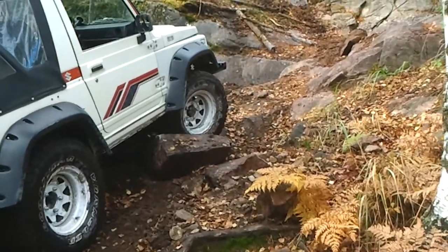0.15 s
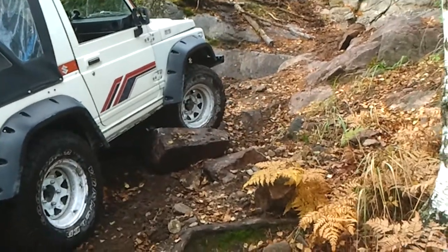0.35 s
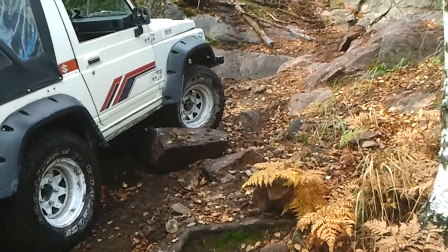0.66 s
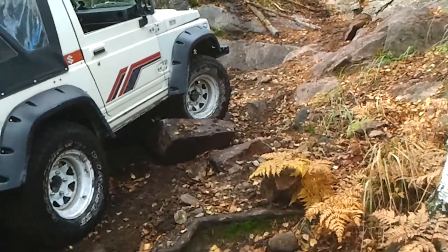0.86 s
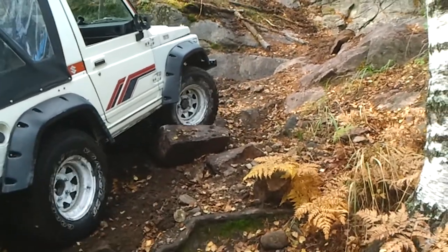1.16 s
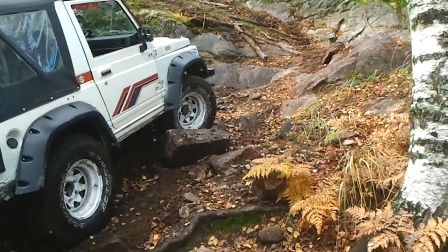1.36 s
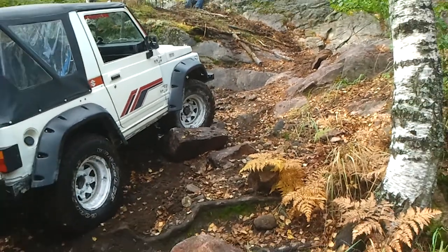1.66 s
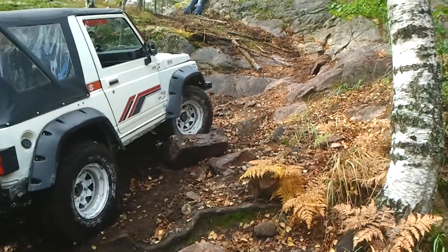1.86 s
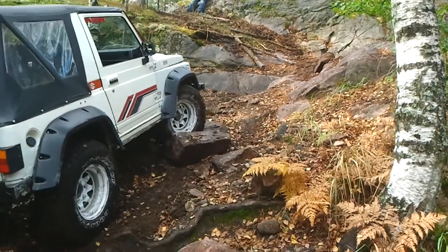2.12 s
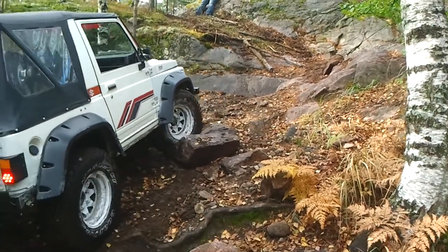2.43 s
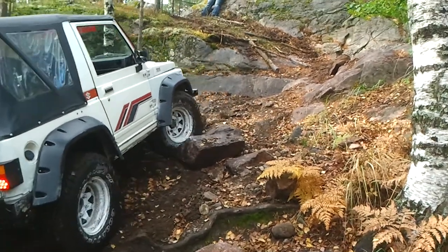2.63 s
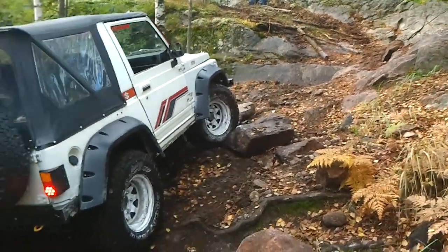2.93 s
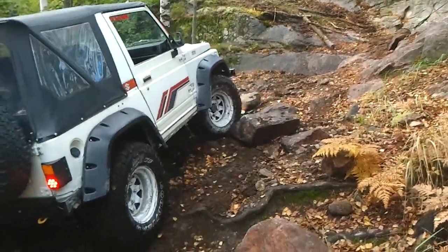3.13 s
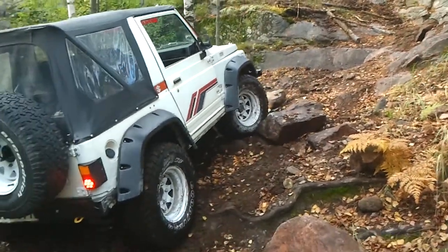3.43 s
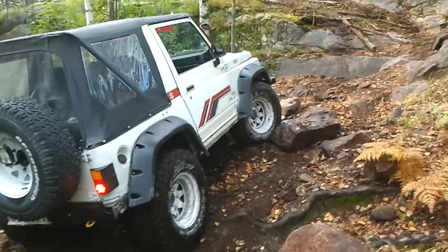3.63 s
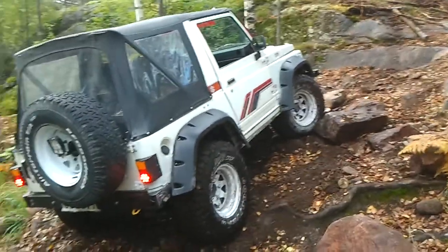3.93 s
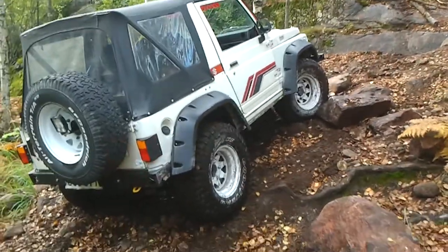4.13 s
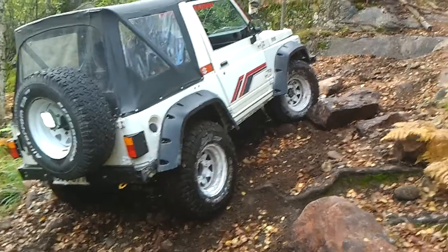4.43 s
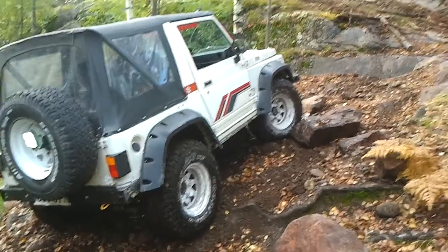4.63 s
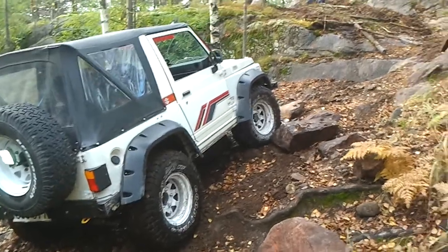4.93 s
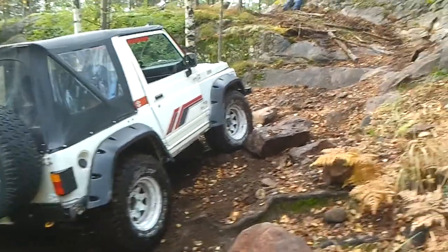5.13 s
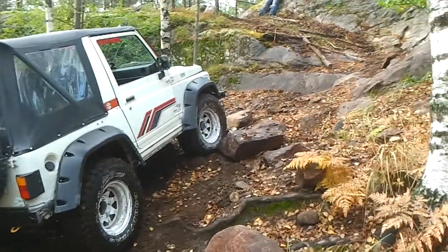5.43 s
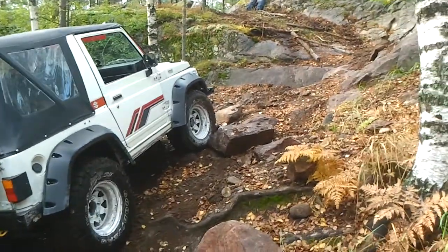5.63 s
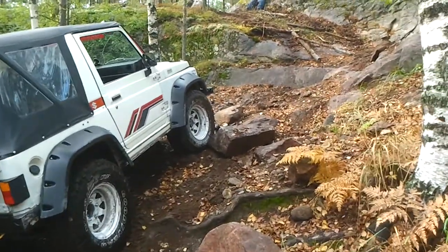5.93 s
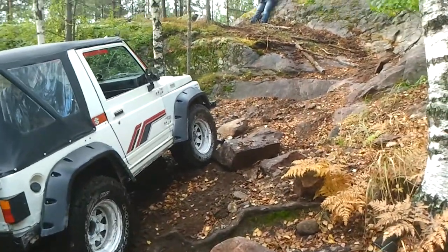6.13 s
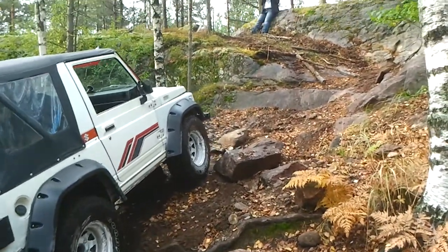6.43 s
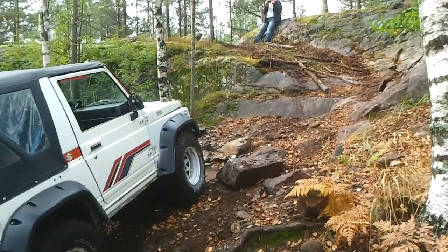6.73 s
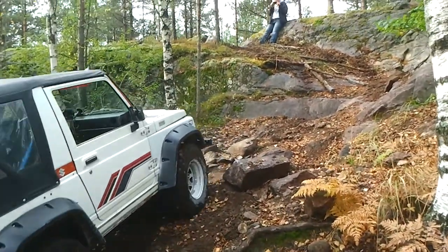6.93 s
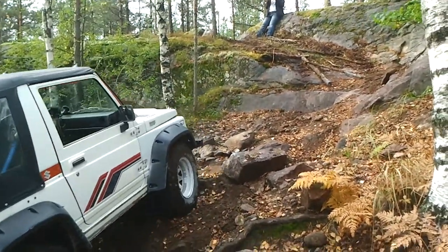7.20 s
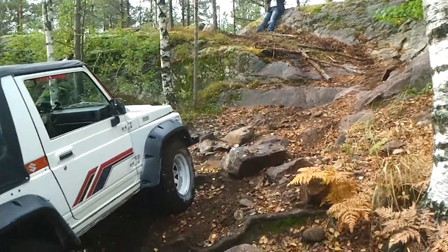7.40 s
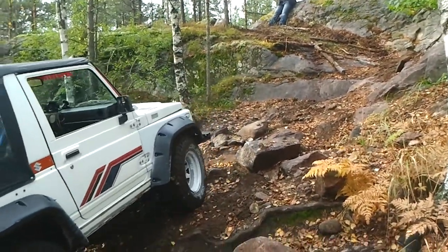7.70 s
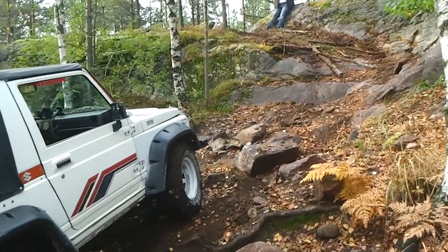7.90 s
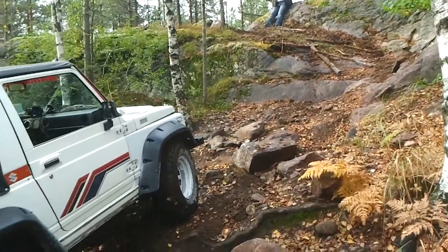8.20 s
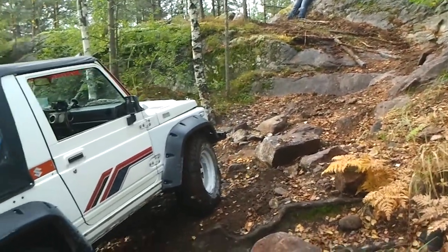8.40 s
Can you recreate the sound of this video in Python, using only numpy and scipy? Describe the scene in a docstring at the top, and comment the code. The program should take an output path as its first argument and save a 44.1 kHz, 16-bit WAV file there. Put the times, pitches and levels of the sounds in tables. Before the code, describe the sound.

A small off-road vehicle's engine climbs to a raspy rev, dips and surges again, heard from nearby in a quiet forest. As it sinks to an uneven idle there is a short brake squeak, a sharp click of stone and scattered knocks. The throttle is blipped once, then the tyres grind slowly over gravel with thuds and metal clanks, while another engine hums faintly far off.

```python
"""A rocky forest slope. A small four-cylinder off-roader revs twice, rolls back as the engine sinks to
a lumpy idle, then takes one more stab of throttle and crawls on. Firing pulses ring the exhaust pipe,
which also pops; valves tick over the fan, the body knocks and driveline slack clanks. The brakes squeal
and tyres thud and grind over stones and leaves. Another engine hums far off near the end."""
import sys
import numpy as np
from scipy import signal
from scipy.fft import rfft, irfft
from scipy.io import wavfile
from scipy.ndimage import uniform_filter1d

SR = 44100
rng = np.random.default_rng(int(sys.argv[2]) if len(sys.argv) > 2 else 0)


def dump(signal):
    """Clip the signal to [-1, 1] and save it as 16-bit WAV at the path in sys.argv[1]."""
    limited = np.clip(np.atleast_2d(signal).T, -1, 1)
    pcm = np.round(limited * 32767).astype(np.int16)
    wavfile.write(sys.argv[1], SR, pcm)


N = 377496
T = np.arange(N) / SR
IDLE_HZ = 30  # firings per second

# The revs. Each row: time in seconds, firings per second.
FIRING_RATE = [(0.0, 48.4), (0.41, 38.6), (0.54, 44), (0.75, 68), (0.88, 80.4), (1.23, 90), (1.4, 99),
               (1.51, 102), (1.73, 96.7), (1.88, 81.5), (2.02, 80), (2.29, 88.8), (2.99, 62.9), (3.49, 51),
               (3.92, 35.8), (4.27, 27.2), (5.84, 25.6), (5.86, 30), (5.91, 40), (5.97, 56), (5.99, 53.5),
               (6.08, 59.6), (6.19, 55), (6.29, 40.4), (6.51, 33.4), (6.7, 31.7)]
# The tone of grinding grit. Each row: frequency in Hz, gain in dB.
GRIT_TONE = [(300, -22.5), (1000, -4.5), (1300, -0.5), (2300, -1.5), (3200, -8), (6200, -1.5),
             (8500, -29.5)]
# How clatter and gravel swell as the vehicle works: five dB terms, as listed in loudness().
CLATTER_LEVELS = (-48, 10, 7.5, 6.5, 12.5)


def amp(db):
    """Decibels to gain."""
    return 10 ** (np.asarray(db) / 20)


def unit_rms(x):
    """Scales to rms 1."""
    return x / np.sqrt(np.mean(x ** 2) + 1e-20)


def steadied(x, span_s=0.13):
    """Scales to a running rms of 1, keeping the quick throb."""
    size = int(span_s * SR)
    power = uniform_filter1d(uniform_filter1d(x ** 2, size), size)
    return x / np.sqrt(abs(power) + 1e-14)


def curves(rows):
    """Turns rows of a time and its values into one curve per value."""
    times, *columns = np.transpose(rows)
    return [np.interp(T, times, column) for column in columns]


def gesture(start, held, depth, attack, release):
    """Rises, holds and lets go; times in seconds."""
    return depth * np.clip(np.minimum((T - start) / attack, 1 - (T - start - held) / release), 0, 1)


def drift(per_s):
    """A random wander with per_s turning points a second."""
    knots = rng.standard_normal(1000)
    return np.interp(T * per_s, np.arange(len(knots)), knots)


def add(mix, start_s, sound):
    """Mixes a sound in at its start time."""
    part = mix[max(round(start_s * SR), 0):][:len(sound)]
    part += sound[:len(part)]


def band(x, lo_hz, hi_hz, order=4):
    """Causal band-pass."""
    return signal.sosfilt(signal.butter(order, [lo_hz, hi_hz], "band", fs=SR, output="sos"), x)


def colour(x, points, size=8192):
    """Minimum-phase EQ through points of frequency in Hz and gain in dB."""
    hz, db = np.transpose(points)
    bin_hz = abs(np.fft.fftfreq(size, 1 / SR))
    log_gain = np.log(amp(np.interp(np.log(bin_hz + 1), np.log(hz), db)))
    taps = np.fft.ifft(np.exp(np.conj(signal.hilbert(log_gain)))).real
    return signal.oaconvolve(x, taps[:size // 2])[:len(x)]


def ring(x, modes):
    """A bank of resonances. Each mode: frequency in Hz, width in Hz, gain in dB."""
    return sum(amp(db) * signal.lfilter(*signal.iirpeak(hz, hz / width, SR), x)
               for hz, width, db in modes)


def load(full_pull_hz=93):
    """The open throttle makes the engine pull at high speed and lug at low speed."""
    # Throttle presses. Each row: start and hold in seconds, depth 0-1, opening and closing in seconds.
    presses = [(.48, .29, 0.63, 0.091, 0.13), (0.791, 0.5, 0.77, 0.18, 0.22),
               (1.841, 0.4286, 0.77, 0.13, 0.028), (5.85, 0.22, 0.89, 0.08, 0.054)]
    throttle = sum(gesture(*press) for press in presses)
    pulling = throttle * np.minimum(curves(FIRING_RATE)[0] / full_pull_hz, 1) ** 2
    return pulling, throttle - pulling


def loudness(levels, resonance=None):
    """Level in dB from revs, load and pace, lifted where the firing rate meets a resonance."""
    # The vehicle crawls on in gear. Each row: time in seconds, pace 0-1.
    crawl = [(6.1, 0), (6.55, 0.19), (6.95, 1), (7.5, 0.64), (8.56, 0.26)]
    idle_db, db_per_octave, pulling_db, lugging_db, crawl_db = levels
    hz = curves(FIRING_RATE)[0]
    pulling, lugging = load()
    db = idle_db + db_per_octave * np.log2(hz / IDLE_HZ) + pulling_db * pulling + lugging_db * lugging
    db += crawl_db * curves(crawl)[0]
    if resonance is None:
        return db
    peak_hz, width_octaves, lift_db = resonance
    return db + lift_db * np.exp(-(np.log2(hz / peak_hz) / width_octaves) ** 2)


def unevenness(coast_hz=56.5):
    """Limp between cylinders and roughness: lumpy at idle, steadier with speed, smooth when pulling."""
    # Stumbles as the throttle shuts at speed. Each row: start in seconds, hold in seconds, limp 0-1.
    stumbles = [(1.58, 0.12, 0.6), (2.28, .14, 0.4)]
    at_idle, at_coast, at_pull = (0.4, 0.27), (0.14, 0.22), (0.022, 0.055)  # limp, roughness
    speed = np.interp(curves(FIRING_RATE)[0], [IDLE_HZ, coast_hz], [0, 1])
    pulling = np.clip(load()[0], 0, 1)
    off_load = np.outer(at_idle, 1 - speed) + np.outer(at_coast, speed)
    limp, rough = off_load * (1 - pulling) + np.outer(at_pull, pulling)
    stumble = sum(gesture(*row, attack=0.017, release=0.07) for row in stumbles)
    return np.clip([limp + stumble, rough], 0, 1)


def forest(db=-42.5):
    """A faint, dark, steady rush lies under everything."""
    # The forest's tone. Each row: frequency in Hz, gain in dB.
    tone = [(30, -42.5), (70, -5), (240, 2.5), (500, -15), (870, -10.5), (2900, -27), (3700, -23.5),
            (5900, -31.5), (8000, -44)]
    return amp(db) * unit_rms(colour(rng.standard_normal(N), tone))


def far_engine(second_order_db=-6):
    """Only the lowest orders of a distant engine carry through the trees."""
    # One distant rev. Each row: time in seconds, firings per second, level in dB.
    rev = [(7.35, 54.4, -57), (7.5, 63.35, -42), (7.8, 98.7, -38.5), (8.05, 103.7, -43), (8.55, 101.5, -75)]
    hz, db = curves(rev)
    phase = 2 * np.pi * np.cumsum(hz * (1 + 0.013 * drift(25))) / SR
    fade_in = np.clip((T - rev[0][0]) * 10, 0, 1)
    return amp(db) * (np.sin(phase) + amp(second_order_db) * np.sin(2 * phase)) * fade_in


def rock_echoes(x, reach_s=0.03, count=40, echo_db=-10):
    """Body panels, ground and rock faces send back short echoes that ripple the spectrum."""
    delay, sign = rng.uniform(0.001, reach_s, count), rng.choice([-1, 1], count)
    taps = np.bincount(np.round(delay * SR).astype(int), sign * np.exp(-delay / reach_s))
    taps *= amp(echo_db) / np.linalg.norm(taps)
    taps[0] = 1  # the direct sound
    return signal.oaconvolve(x, taps / np.linalg.norm(taps))[:N]


def gravel(per_s=70, trim_db=-11, spread_db=3, decay_s=0.0017):
    """Grit and dry leaves crackle under the tyres, louder as the vehicle works."""
    clicks = (rng.random(N) < per_s / SR) * amp(spread_db * np.minimum(rng.exponential(1, N), 3.5))
    t = np.arange(500) / SR
    grains = signal.oaconvolve(clicks, np.exp(-t / decay_s))[:N] * rng.standard_normal(N)
    return amp(loudness(CLATTER_LEVELS) + trim_db) * unit_rms(colour(grains, GRIT_TONE))


def stone_snaps(phase_jitter=0.36):
    """Stones click together under the tyres with an unsteady ring that dies at once."""
    # Each row: start in seconds, peak in dB, pitch in Hz, decay in seconds.
    snaps = [(3.3695, -1.5, 3500, 0.00041), (4.999, -28, 1110, 0.013), (5.046, -24, 865, 0.0029),
             (5.063, -20.5, 870, 0.0016), (5.266, -23.5, 1210, 0.0017), (5.666, -31, 1560, 0.0016),
             (6.803, -16.5, 1780, 0.0013), (6.819, -19.5, 2272, 0.00084)]
    out, t = np.zeros(N), np.arange(SR // 20) / SR
    for start, db, hz, decay in snaps:
        phase = 2 * np.pi * hz * t + phase_jitter * np.cumsum(rng.standard_normal(len(t)))
        add(out, start, amp(db) * np.sin(phase) * np.exp(-(t / (2 * decay)) ** 2))
    return out


def scrapes(slips_per_s=900, slip_db=11):
    """Dense slips of rubber on rock and of shoe on drum, which sets the brake ringing."""
    # Each row: start in seconds, length in seconds, level in dB, brake ring against the grit in dB.
    grinds = [(0, 0.11, -32.5, -15), (3.12, 0.014, -25.5, -37), (3.141, 0.028, -27, 0),
              (3.167, 0.054, -27.5, 2), (3.331, 0.035, -33, 10.5), (3.507, 0.13, -36, -8),
              (4.399, 0.083, -45, -18), (4.621, 0.017, -35, -26), (5.074, 0.13, -45, -34),
              (7.108, 0.044, -37, -24), (7.317, 0.074, -39, -36)]
    # The brake's modes. Each row: frequency in Hz, width in Hz, gain in dB.
    brake_modes = [(992, 22, 11), (1570, 60, -3), (2230, 110, 0), (2650, 120, -1)]
    out, t = np.zeros(N), np.arange(SR // 4) / SR
    for start, length, db, ring_db in grinds:
        stroke = np.clip(t / 0.004, 0, 1) * np.exp(-np.maximum(t - 0.53 * length, 0) / (0.42 * length))
        noise = rng.standard_normal(len(t))
        slips = rng.random(len(t)) < slips_per_s / SR
        friction = unit_rms(noise * (1 + amp(slip_db) * slips)) * stroke
        grit = unit_rms(colour(friction, GRIT_TONE))
        drum = amp(ring_db) * unit_rms(ring(friction, brake_modes))
        add(out, start, amp(db) * (grit + drum) * np.sqrt(np.mean(stroke ** 2)))
    return out


def brake_squeals(shake_db=-0.5, attack_s=0.016, release_s=0.054):
    """A dragging brake sings briefly on one unsteady mode."""
    # Each row: start and length in seconds, level in dB, pitch in Hz, glide in Hz a second, waver share.
    squeals = [(3.253, 0.075, -17.5, 5430, -1800, 0.014), (7.844, 0.071, -29, 3203, 147, 0.0073)]
    out = np.zeros(N)
    for start, length, db, hz, glide, waver in squeals:
        pitch = (hz + glide * np.clip(T - start, 0, length)) * (1 + waver * drift(110))
        swell = gesture(start, length - release_s, amp(db), attack_s, release_s)
        swell *= amp(shake_db * drift(92))
        out += swell * np.sqrt(2) * np.sin(2 * np.pi * np.cumsum(pitch) / SR)
    return out


def driveline_clanks(trim_db=-8, rise_s=0.0082, echo_db=-21, echo_decay_s=0.053):
    """Slack in the driveline closes in a short rattle that rings the axle; the rocks answer."""
    # Each row: start in seconds, relative level in dB, rattle decay in seconds.
    clanks = [(1.043, -14, 0.011), (2.354, -7.5, 0.017), (6.577, -8, 0.0096), (7.399, -7, 0.0076)]
    # The axle's modes. Each row: frequency in Hz, width in Hz, gain in dB.
    axle_modes = [(413, 22.5, 16), (994, 100, 8), (1247, 113, 14.5), (1760, 204, 15.5), (2260, 31, -13),
                  (2670, 57, -41.5), (4270, 650, -42)]
    out, t = np.zeros(N), np.arange(SR // 4) / SR
    for start, db, decay in clanks:
        echo = amp(echo_db) * np.exp(-t / echo_decay_s)
        blow = (1 - np.exp(-t / rise_s)) * (np.exp(-t / decay) + echo)
        metal = steadied(ring(rng.standard_normal(len(t)), axle_modes), span_s=0.015)
        add(out, start, amp(db + trim_db) * metal * blow / blow.max())
    return out


def pops_and_thuds(crack_decay_s=0.0059):
    """Exhaust pops, body knocks and low tyre thuds, each a thump with a short crack."""
    # Each row: start in seconds, level in dB, pitch in Hz, decay in seconds, relative crack in dB.
    hits = [(.609, -16.5, 570, 0.0025, -12), (3.931, -7.5, 344, 0.0018, -17.5),
            (4.229, -27, 260.7, 0.021, -27), (4.955, -11, 241, 0.0044, -7.5), (5.802, -22, 990, 0.0035, -5),
            (5.884, -20.5, 300, 0.0021, -4), (5.917, -17, 386.6, 0.003, -2),
            (6.919, -13.5, 216, 0.0089, -8), (7.076, -20.5, 210.2, 0.021, -22)]
    crack_modes = [(667, 250, -1.5), (2180, 1800, -24.0)]
    out, t = np.zeros(N), np.arange(SR // 6) / SR
    for start, db, hz, decay, crack_db in hits:
        thump = np.sin(2 * np.pi * hz * t) * np.exp(-t / decay)
        noise = steadied(ring(rng.standard_normal(len(t)), crack_modes), span_s=0.0057)
        crack = amp(crack_db) * noise * np.exp(-t / crack_decay_s)
        add(out, start, amp(db) * (thump / thump.max() + crack))
    return band(out, 170, 6900, order=2)


def throttle_whistle(top_hz=875, sag_hz=150, span_hz=11, waver=0.012, shake_db=3):
    """Air whistles faintly past the shut throttle; the note sags as the engine nears idle."""
    # The dB terms for loudness(): the whistle ducks under load.
    levels = (-56.5, 4.5, -12, -13, 8)
    hz = top_hz - sag_hz * np.exp(-(curves(FIRING_RATE)[0] - IDLE_HZ) / span_hz)
    phase = 2 * np.pi * np.cumsum(hz * (1 + waver * drift(100))) / SR
    return amp(loudness(levels) + shake_db * drift(51)) * np.sin(phase)


def engine_bay(cycles, tick_db=-7, intake_db=-10, flutter_db=1.06, tick_decay_s=0.0034):
    """Valves tick twice a firing over the fan's rush, which swells with every stroke; the air box hums."""
    # Midrange clatter and bright hiss. Each row: frequency in Hz, gain in dB.
    clatter_tone = [(530, -24), (900, -8), (1070, -8), (1350, -4), (1770, -5), (2000, -8), (3100, -19),
                    (5000, -53)]
    hiss_tone = [(1470, -27.5), (2500, -5), (3240, -7.5), (3780, -3), (4520, -5.5), (6280, -4),
                 (7170, -9.5), (8860, -10)]
    # The hiss's dB terms for loudness().
    hiss_levels = (-46, 9, 1.5, 3.5, 4.5)
    clatter_db, hiss_db = loudness(CLATTER_LEVELS), loudness(hiss_levels)
    valves = np.diff(np.floor(2 * cycles), prepend=0) * amp(3.3 * rng.standard_normal(N))
    t = np.arange(600) / SR
    tick = rng.standard_normal(len(t)) * np.exp(-t / tick_decay_s)
    ticks = amp(tick_db) * unit_rms(signal.oaconvolve(valves, tick)[:N])
    stroke = 1 + 0.22 * np.cos(2 * np.pi * cycles) + 0.098 * np.cos(np.pi * cycles)
    mid_rush, high_rush, intake = rng.standard_normal((3, N)) * stroke * amp(flutter_db * drift(45))
    clatter = amp(clatter_db) * steadied(colour(mid_rush + ticks, clatter_tone))
    hiss = amp(hiss_db) * steadied(colour(high_rush + ticks, hiss_tone))
    air_box = unit_rms(ring(ring(intake, [(845, 160, 0)]), [(856, 95, 0)]))
    return clatter + hiss + amp(clatter_db + intake_db) * air_box


def tailpipe_boom(cycles, centre_hz=62, width_octaves=0.86, shake_db=2.5, half_order=0.16):
    """The tailpipe radiates the two lowest orders as a smooth hum; a limp at speed adds the half order."""
    # The boom's dB terms for loudness().
    levels = (-52, 9, -4, 8.5, 7)
    hz, limp = curves(FIRING_RATE)[0], unevenness()[0]
    hum = np.zeros(N)
    for order, size in [(0.5, half_order * limp), (1, 0.94), (2, 1)]:
        radiated = np.exp(-(np.log2(order * hz / centre_hz) / width_octaves) ** 2)
        hum += size * radiated * np.sin(2 * np.pi * order * cycles)
    return amp(loudness(levels, resonance=(64.6, 0.33, 11.8)) + shake_db * drift(30)) * steadied(hum)


def firing_pulses(cycles, limp, rough, lag=0.018, imbalance=0.22, jitter=0.084):
    """One pulse a firing; off load, alternate cylinders differ in force and timing, and each burn varies."""
    count = np.arange(1, int(cycles[-1]))
    size_luck, time_luck = rng.standard_normal((len(count), 2)).T
    at = np.searchsorted(cycles, count)
    side = (-1.) ** count
    uneven = 0.25 + limp[at] + 2 * rough[at]
    lope = imbalance * uneven * np.cos(np.pi * count / 2)  # repeats every four firings
    size = 1 + side * limp[at] + lope + rough[at] * size_luck
    timing = count + lag * uneven * side + jitter * rough[at] * time_luck
    sample = np.interp(timing, cycles, np.arange(N))
    return np.bincount(np.round(sample).astype(int), size, N)


def silencer(x, round_trips_s=(0.0023, 0.0061), bounce=0.44):
    """Each chamber passes all pitches alike but smears a pulse over several trips, rounding the note."""
    delay = np.exp(-2j * np.pi * np.outer(round_trips_s, np.fft.rfftfreq(2 * N, 1 / SR)))
    all_pass = np.prod((delay - bounce) / (1 - bounce * delay), axis=0)
    return irfft(rfft(x, 2 * N) * all_pass)[:N]


def exhaust(cycles):
    """Pulses and puffs of gas ring the pipe; load shifts the power from its low resonance upwards."""
    # The pipe's tone. Each row: frequency in Hz, gain in dB.
    pipe_tone = [(48, -2), (108, -12), (145, 14), (175, -2.5), (208, -1.5), (255, 12), (295, 9), (355, 0),
                 (450, -13.5), (590, -16), (900, -18), (1600, -38.5)]
    # The dB terms for loudness() of the low note, the upper note and the rasp.
    low_levels = (-41.5, 10.5, 2, 15, 4.5)
    upper_levels = (-43.5, 12.5, 15, 15, 9.5)
    rasp_levels = (-55, 11, 19.5, 8.5, 18.5)
    limp, rough = unevenness()
    pulses = colour(silencer(unit_rms(firing_pulses(cycles, limp, rough))), pipe_tone)
    gas = (0.41 + np.exp(-(cycles % 1) / 1.6)) * rng.standard_normal(N)
    puffs = rough * colour(unit_rms(gas), pipe_tone)
    low = steadied(band(pulses + 0.45 * puffs, 113, 195))
    upper = steadied(band(pulses + 2.0 * puffs, 201.4, 475))
    rasp = steadied(band(pulses + 2.2 * puffs, 436, 960, order=3))
    return (amp(loudness(low_levels, resonance=(68.2, 0.19, 5.5))) * low
            + amp(loudness(upper_levels, resonance=(67.75, 0.14, 4.3))) * upper
            + amp(loudness(rasp_levels, resonance=(64.8, 0.2, 10.3))) * rasp)


def scene():
    """The vehicle close by, over the faint rush of the forest."""
    # The tailpipe turns towards the listener and away. Each row: time in seconds, gain in dB.
    facing = [(0, 0), (1.3, 0.5), (3.3, 0), (4.25, 5.5), (4.7, -5), (5.7, -6), (6.35, 7), (6.7, -2),
              (8.56, -7)]
    cycles = np.cumsum(curves(FIRING_RATE)[0]) / SR  # running count of firings
    tailpipe = amp(curves(facing)[0]) * (exhaust(cycles) + tailpipe_boom(cycles))
    underbody = rock_echoes(engine_bay(cycles) + throttle_whistle() + gravel() + scrapes()
                            + driveline_clanks() + brake_squeals())
    return (forest() + tailpipe + pops_and_thuds() + stone_snaps() + underbody + far_engine())[None]


def record(dry, ceiling=0.7, edge_hz=8900):
    """The top is dulled above 7 kHz and a limiter caps the sharpest snap; a low-pass follows."""
    dulled = colour(dry[0], [(6800, 0), (7500, -9), (8000, -25), (8800, -26.5)])
    low_pass = signal.firwin(511, edge_hz, window=("kaiser", 9), fs=SR)
    return signal.oaconvolve(np.clip(dulled, -ceiling, ceiling), low_pass, "same")[None]


dry = scene()
out = record(dry)
dump(out)
```